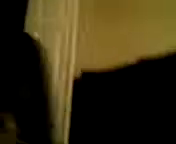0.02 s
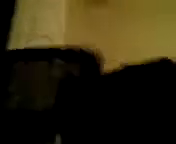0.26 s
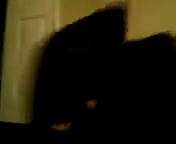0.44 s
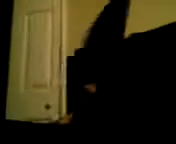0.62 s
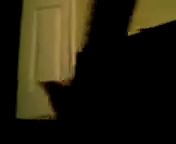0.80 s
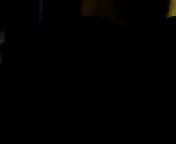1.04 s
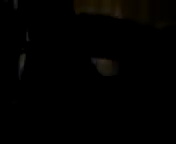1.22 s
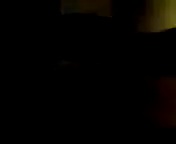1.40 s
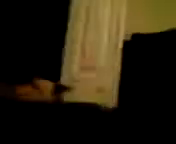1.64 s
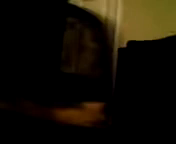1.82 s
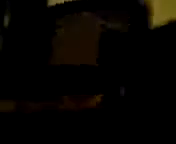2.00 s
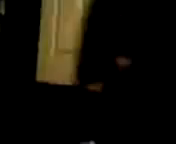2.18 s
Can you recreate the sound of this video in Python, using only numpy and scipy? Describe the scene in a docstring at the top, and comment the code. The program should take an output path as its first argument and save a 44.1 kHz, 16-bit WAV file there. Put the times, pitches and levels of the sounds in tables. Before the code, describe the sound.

Swivel chair clacks at two shoves, with hand scuffs and a faint rumble in between.

```python
"""Swivel chair, spun by hand.

A small, quiet room, the microphone close to the chair and facing it. Hands scuff over the
back; at each of two shoves the loose seat knocks and clacks on its post, ringing the frame
and the steel swivel plate. The bearing rumbles softly in between, over mains hum and hiss."""
import sys
import numpy as np
from scipy import signal
from scipy.fft import rfft, irfft
from scipy.io import wavfile
from scipy.ndimage import uniform_filter1d, map_coordinates

SR = 44100
rng = np.random.default_rng(int(sys.argv[2]) if len(sys.argv) > 2 else 0)


def dump_mix(stems):
    """Bounce the given channels to the path in sys.argv[1] as a 16-bit WAV at rate SR."""
    frames = np.atleast_2d(stems).T  # one column per channel
    limited = np.clip(frames, -1, 1)  # hard clip at full scale
    pcm = np.round(limited * 32767).astype(np.int16)
    wavfile.write(sys.argv[1], SR, pcm)


N = 103635

# modes of the steel swivel plate, rung by clacks and scrapes: f/Hz, level/dB, t60/s
PLATE_MODES = [(1240, 6, .34), (1410, -15, 0.69), (1455, -8.5, 0.1), (1545, -10, 0.26), (1696, 0, 0.22),
               (1793, 9, 0.12), (1897, -7.5, 0.55), (2060, -33.5, 0.34), (2485, -7, 0.35),
               (2720, -3.5, 0.26)]


def knocks():
    """The loose seat rocks against its stop: each short, dull push rings the frame."""
    # pushes: t/s, peak level/dB, contact cut-off/Hz, low cut/Hz
    pushes = [(0.083, -37.5, 285, 148), (.122, -43.5, 350, 100), (.139, -42, 350, 100),
              (.2255, -27.5, 1200, 131), (0.2326, -19, 700, 161), (0.2442, -26.5, 1490, 60),
              (0.2664, -9, 2100, 102), (.2785, -48, 1190, 60), (.2815, -33, 1200, 60),
              (0.292, -46, 1500, 60), (.593, -44.5, 590, 295), (0.833, -45.5, 600, 149),
              (.93, -48.5, 380, 119), (1.045, -41.5, 765, 198), (1.057, -58, 600, 200),
              (1.187, -42.5, 1140, 200), (1.486, -44.5, 1040, 496), (1.515, -44, 870, 635),
              (1.613, -37, 900, 400), (1.653, -35, 690, 244), (1.753, -32, 2700, 734),
              (1.8742, -25.5, 1640, 93), (1.8851, -28, 840, 78), (1.9069, -21.5, 1370, 78),
              (2.234, -51, 660, 290), (2.314, -50, 950, 297)]
    # spectrum of a push: f/Hz, level/dB
    knock_spectrum = [(30, -11.5), (120, -15.5), (250, -5.5), (400, -2.5), (700, -3), (1000, -16.5),
                      (1550, -6), (2200, -25), (3200, -49.5), (6000, -27), (13000, -61)]
    # modes of the chair's frame: f/Hz, level/dB, t60/s
    frame_modes = [(239, 0, 0.19), (377.5, -10.5, 0.18), (463, -10.5, 0.23), (555, -6, 0.069),
                   (712.4, -2, 0.12), (860, 0, 0.23), (1234, 10.5, 0.073), (1413, 7, 0.11),
                   (1661, 11.5, 0.056), (1880, 8, 0.055)]
    out = np.zeros(N)
    for start, db, cut_hz, low_hz in pushes:
        push = highpass(colour(knock_spectrum, cut_hz), low_hz)
        add(out, start, -undb(db) * push / np.abs(push).max())
    return room(resonate(out, ringing(frame_modes), ring_db=-9), wet_db=-4.5)


def clacks(chatter_s=.0016, chatter_db=5.5):
    """Hard parts of the swivel meet, chatter for a few milliseconds and ring the plate."""
    # contacts: t/s, peak level before chatter/dB, contact cut-off/Hz
    contacts = [(0.2209, -30, 1410), (0.2595, -27.5, 4300), (0.2617, -21.5, 8500), (.273, -24.5, 12000),
                (0.2752, -36, 8000), (0.352, -35.5, 2530), (0.565, -57.5, 3970), (1.195, -57.5, 4100),
                (1.754, -54, 7000), (1.9250, -28, 6230), (1.928, -26, 3300)]
    # spectrum of a contact: f/Hz, level/dB
    clack_spectrum = [(60, -25), (300, 5), (650, -15), (1000, -10), (1900, 3.5), (2700, 3), (3400, -4),
                      (4100, 0), (5000, -12), (6000, -1.5), (7300, -7), (9800, -16.5), (10700, -26),
                      (13000, -27)]
    out = np.zeros(N)
    for start, db, cut_hz in contacts:
        tick = colour(clack_spectrum, cut_hz)
        t = np.arange(len(tick)) / SR
        chatter = energy(rng.standard_normal(len(t)) * np.exp(-t / chatter_s))
        clack = tick + undb(chatter_db) * convolve(tick, chatter)
        add(out, start, undb(db) * clack / np.abs(tick).max())
    centre = room(resonate(out, ringing(PLATE_MODES), ring_db=-12), wet_db=-6.5)
    treble_width = room(out, wet_db=-14) - out
    return centre + spread(treble_width)


def scuffs(pitch_jitter=.04, jitter_s=.0006):
    """Hands scrape over the back, ringing the plate, and catch in short, rough squeaks."""
    # strokes: start t/s, loudest t/s, end t/s, level/dB, fabric hiss/dB re stroke,
    # low edge/Hz, top edge/Hz, plate ring/dB re stroke
    strokes = [(-.04, -0.001, 0.035, -39, -15, 663, 2770, 0.5),
               (0.03, 0.056, 0.11, -53.5, -13, 250, 2580, -4),
               (0.181, 0.195, 0.26, -49, -34, 1500, 2620, -13),
               (0.199, 0.264, 0.35, -35.5, -15, 197, 3260, -10.5),
               (0.81, 0.81, 1, -69.5, -27, 250, 2540, -13), (1.296, 1.41, 1.52, -64, -16, 297, 2240, -10),
               (1.5, 1.515, 1.67, -60.5, -31, 394, 2970, -14),
               (1.572, 1.64, 1.69, -50.5, -19, 251, 2640, -26),
               (1.652, 1.68, 1.715, -48, -29, 400, 3100, -12),
               (1.705, 1.774, 1.81, -49.5, -32, 200, 2550, -21),
               (1.79, 1.809, 1.86, -46, -40, 396, 3070, -25),
               (1.844, 1.899, 1.935, -45, -42, 203, 3020, -27),
               (1.903, 1.946, 2.005, -42.5, -11.5, 200, 3330, -13)]
    # squeaks: t/s, length/s, level/dB, f/Hz
    catches = [(.001, 0.01, -46.5, 744), (.006, 0.0086, -46, 2313), (0.189, 0.0061, -46.5, 1750),
               (.203, 0.01, -40.5, 546), (0.206, 0.0047, -41, 1840), (1.509, 0.0077, -46.5, 774),
               (1.611, 0.011, -50, 2390), (1.670, 0.011, -51, 1655), (1.687, 0.0049, -48, 2650),
               (1.765, 0.012, -46, 1257), (1.827, 0.0047, -44, 795), (2.172, 0.0018, -59, 2730)]
    # spectrum of the rubbing: f/Hz, level/dB
    rub_spectrum = [(60, -48.5), (250, -1), (600, 0.5), (950, -3), (1250, -.5), (1700, -1), (2050, -2),
                    (2700, -4), (3200, -11), (3700, -17), (6000, -32)]
    # spectrum of the fabric's hiss: f/Hz, level/dB
    fabric_spectrum = [(200, -15), (2500, 6.5), (4200, 2), (5300, -4.5), (7200, -5.5), (9000, -14),
                       (10700, -25), (13000, -37)]
    out, t = np.zeros(N), np.arange(N) / SR
    plate = ringing(PLATE_MODES)
    rub = convolve(grains(per_s=1100, spread_db=1.5), colour(rub_spectrum))
    hiss = unit(convolve(rng.standard_normal(N), colour(fabric_spectrum)))
    for start, loudest, end, db, hiss_db, low_hz, top_hz, ring_db in strokes:
        scrape = unit(lowpass(highpass(rub, low_hz), top_hz, order=10))
        effort = undb(db) * np.interp(t, [start, loudest, end], [0, 1, 0])
        out += resonate(effort * scrape, plate, ring_db) + effort * undb(hiss_db) * hiss
    for start, length, db, hz in catches:
        wobble = unit(uniform_filter1d(rng.standard_normal(SR // 10), int(jitter_s * SR)))
        squeak = np.sin(2 * np.pi * np.cumsum(hz * (1 + pitch_jitter * wobble)) / SR)
        window = signal.windows.tukey(int(length * SR))
        add(out, start, undb(db) * unit(squeak[:len(window)] * window))
    return room(out, wet_db=-5)


def bearing(speed_drift=.08, swell_db=1.5):
    """The bearing rolls, heard through the hollow seat; its rumble swells and its resonances wander."""
    # spectrum of the rumble: f/Hz, level/dB
    rumble_spectrum = [(30, -22), (90, -19), (190, -9), (290, 1.5), (430, 0), (600, 0.5), (830, -16),
                       (1200, -11), (1700, -33), (3000, -29.5), (8000, -41)]
    # rumble between and under the shoves: t/s, level/dB
    rumble_levels = [(0, -55), (.14, -54.5), (.3, -62), (.5, -59.5), (.6, -58), (.72, -60.5), (.92, -56.5),
                     (.99, -60), (1.07, -56), (1.3, -58), (1.45, -56.5), (1.53, -52), (1.7, -53),
                     (1.87, -53.5), (2.05, -59), (2.16, -56.5), (2.35, -58.5)]
    grind = convolve(grains(per_s=800, spread_db=1.5), colour(rumble_spectrum))
    travel = np.cumsum(1 + speed_drift * wander(seconds=.09))
    rolling = map_coordinates(grind, [travel], mode="mirror")  # the grind at a drifting speed
    rolling *= undb(swell_db * wander(seconds=.04))
    level_db = np.interp(np.arange(N) / SR, *np.array(rumble_levels).T)
    return undb(level_db) * unit(room(rolling, wet_db=-7))


def bumps(rise_s=.011):
    """The base leans on the floor with a low, quickly damped swing."""
    # soft bumps: t/s, level/dB, f/Hz
    floor_bumps = [(.226, -47, 118), (0.271, -50, 55), (0.295, -51, 125), (0.884, -61, 75),
                   (1.036, -59, 78), (1.877, -60, 85), (1.908, -66, 112), (2.268, -54, 77)]
    out, t = np.zeros(N), np.arange(SR // 5) / SR
    envelope = t / rise_s * np.exp(1 - t / rise_s)
    for start, db, hz in floor_bumps:
        add(out, start, undb(db) * envelope * np.sin(2 * np.pi * hz * t))
    return out


def sway(db=-69):
    """A deep rumble of the base sets in with the second shove."""
    rumble = unit(lowpass(rng.standard_normal(N), hz=70, order=3))
    return undb(db) * rumble * np.interp(np.arange(N) / SR, [1.8, 1.88], [0, 1])


def brush(at_s=1.655, width_s=.016, db=-69):
    """A faint, bright brush of cloth as the hand takes hold."""
    hiss = unit(highpass(rng.standard_normal(N), hz=4500))
    return undb(db) * hiss * np.exp(-((np.arange(N) / SR - at_s) / width_s) ** 2)


def room_tone(hum_hz=119.3, hum_db=-59.5, air_db=-65.5, side_db=-76.5):
    """Mains hum and faint hiss; only the top of the hiss differs between left and right."""
    # spectrum of the hiss: f/Hz, level/dB
    air_spectrum = [(25, -2.5), (60, -5), (150, -1), (500, 1.5), (1000, -27), (2000, -13.5), (4000, -20.5),
                    (8000, -23.5), (13000, -23.5)]
    hum = undb(hum_db) * unit(np.sin(2 * np.pi * hum_hz * np.arange(N) / SR))
    air = undb(air_db) * unit(convolve(rng.standard_normal(N), colour(air_spectrum)))
    return hum + air + undb(side_db) * unit(spread(rng.standard_normal(N)))


def room(x, wet_db, t60_s=.36, treble_t60_s=.28, gap_s=.0017, build_s=.0023):
    """Direct sound plus the small room's dense, quickly building reflections; treble dies sooner."""
    t = np.arange(int(SR * .7)) / SR
    noise = rng.standard_normal(len(t))
    low = lowpass(noise, hz=2500)
    tail = low * undb(-60 * t / t60_s) + (noise - low) * undb(-60 * t / treble_t60_s)
    onset = np.clip((t - gap_s) / build_s, 0, 1)
    return x + undb(wet_db) * convolve(x, energy(tail * onset))


def ringing(modes):
    """Impulse response of a part: one decaying sine for each mode."""
    t = np.arange(SR // 2) / SR
    return sum(undb(db - 60 * t / t60) * np.sin(2 * np.pi * hz * t + rng.uniform(0, 2 * np.pi))
               for hz, db, t60 in modes)


def resonate(x, response, ring_db):
    """A part rings along, its energy ring_db relative to the sound that excites it."""
    return x + undb(ring_db) * energy(convolve(x, response)) * np.sqrt(np.sum(x ** 2))


def colour(spectrum, cut_hz=None, size=2048):
    """Causal response of a spectrum, dulled above the cut-off of a soft contact."""
    f = np.maximum(np.fft.rfftfreq(size, 1 / SR), 1)
    hz, db = np.array(spectrum).T
    gain = undb(np.interp(np.log(f), np.log(hz), db))
    if cut_hz:
        gain = gain / np.hypot(1, (f / cut_hz) ** 2)
    # minimum phase: folding the cepstrum packs the energy at the start
    cepstrum = irfft(np.log(gain))
    cepstrum[1:size // 2] *= 2
    cepstrum[size // 2 + 1:] = 0
    return irfft(np.exp(rfft(cepstrum)))


def grains(per_s, spread_db):
    """Random tiny slips of uneven size."""
    slips = (rng.random(N) < per_s / SR) * rng.choice([-1, 1], N)
    return slips * undb(spread_db * np.clip(rng.standard_normal(N), -2, 2))


def wander(seconds):
    """Smooth random drift of rms 1."""
    size = int(seconds * SR)
    drift = uniform_filter1d(rng.standard_normal(N), size, mode="wrap")
    return unit(uniform_filter1d(drift, size, mode="wrap"))


def spread(x):
    """The treble alone, in opposite sign left and right, for width."""
    return highpass(x, hz=4600, order=10) * np.array([[1], [-1]])


def lowpass(x, hz, order=2):
    """Roll off the top."""
    return signal.sosfilt(signal.butter(order, hz, fs=SR, output="sos"), x)


def highpass(x, hz, order=2):
    """Roll off the bottom."""
    return signal.sosfilt(signal.butter(order, hz, "high", fs=SR, output="sos"), x)


def undb(db):
    """Decibels to gain."""
    return 10 ** (np.asarray(db) / 20)


def unit(x):
    """Scale to rms 1."""
    return x / np.sqrt(np.mean(x ** 2))


def energy(x):
    """Scale to energy 1."""
    return x / np.sqrt(np.sum(x ** 2))


def convolve(x, response):
    """Pass a sound through an impulse response."""
    return signal.fftconvolve(x, response)[:len(x)]


def add(out, start_s, x):
    """Mix a sound in at a time."""
    i = max(int(start_s * SR), 0)
    out[i:i + len(x)] += x[:max(N - i, 0)]


def scene():
    """The chair close up, straight ahead of the microphone in the quiet room."""
    return room_tone() + knocks() + clacks() + scuffs() + bearing() + bumps() + sway() + brush()


def record(dry):
    """The microphone's signal, cut steeply at the top."""
    top_hz = 13100
    return signal.sosfilt(signal.ellip(10, .2, 70, top_hz, fs=SR, output="sos"), dry)


dry = scene()
out = record(dry)
dump_mix(out)
```